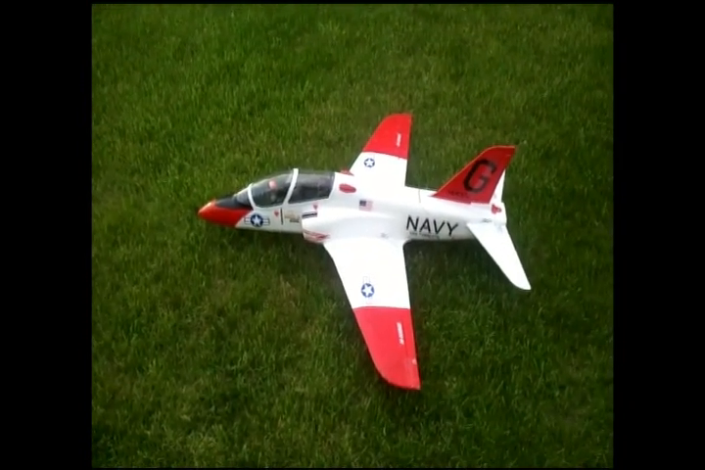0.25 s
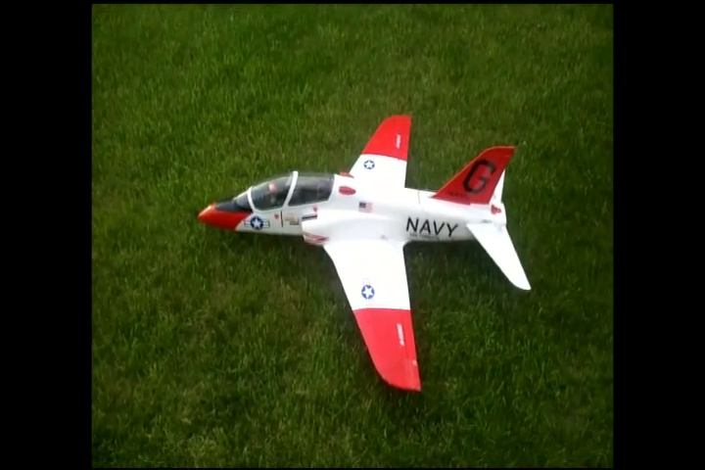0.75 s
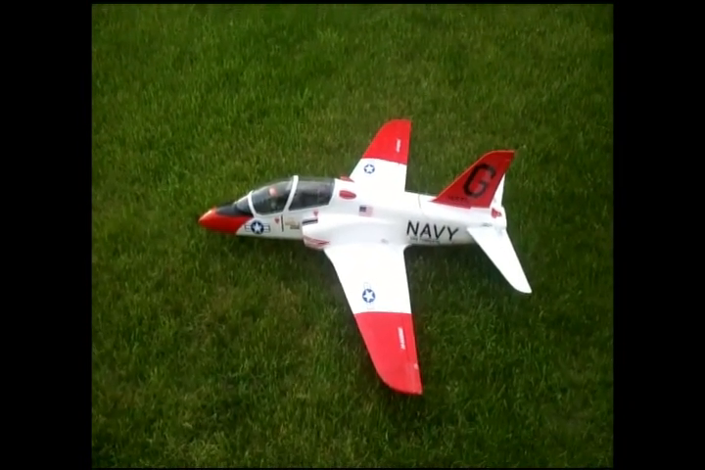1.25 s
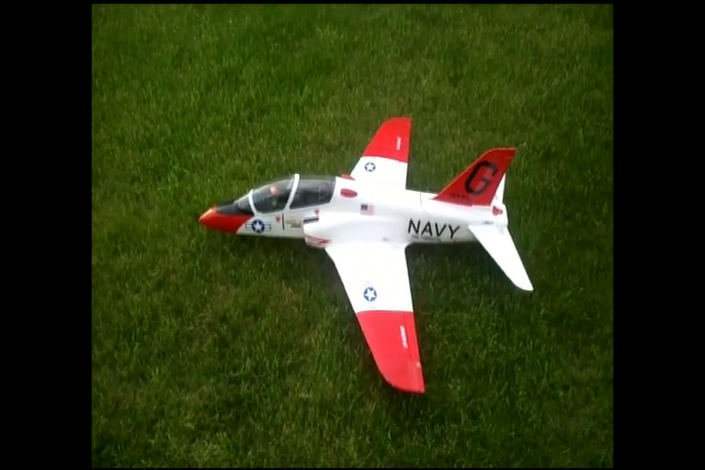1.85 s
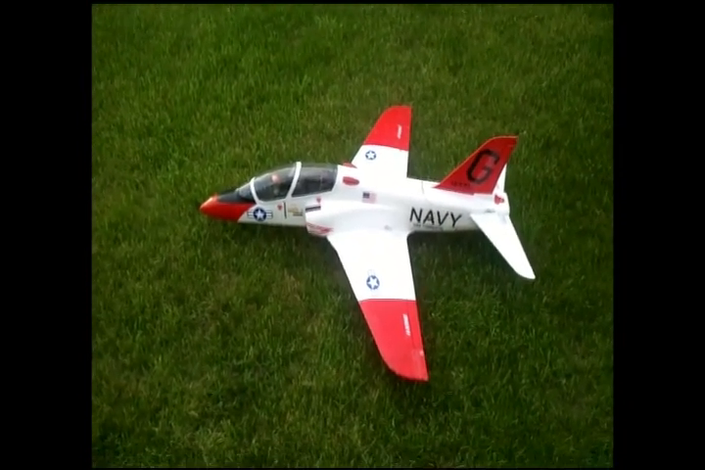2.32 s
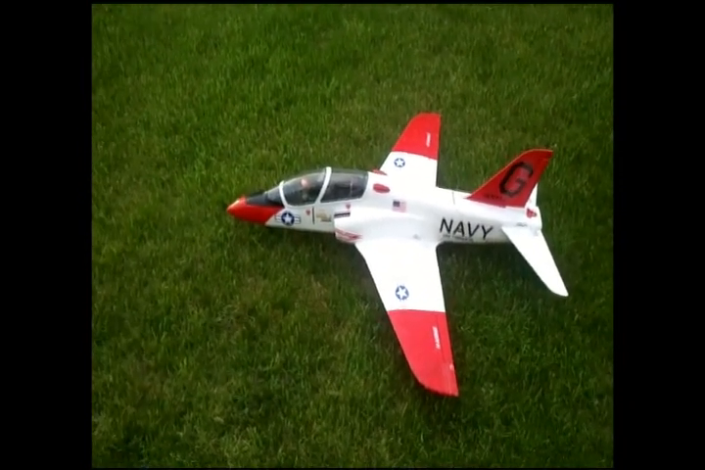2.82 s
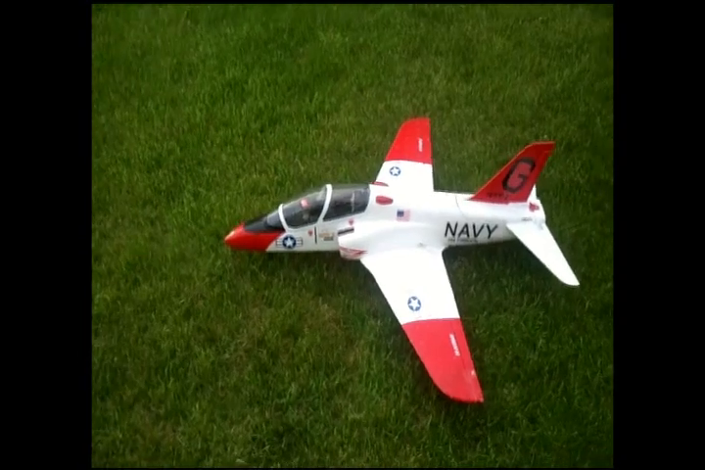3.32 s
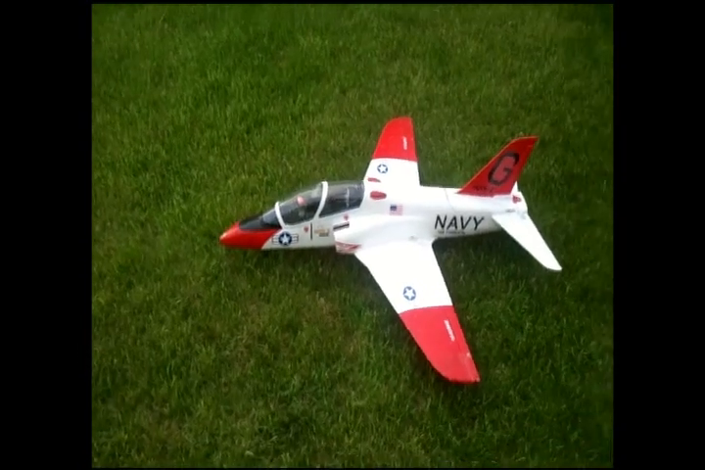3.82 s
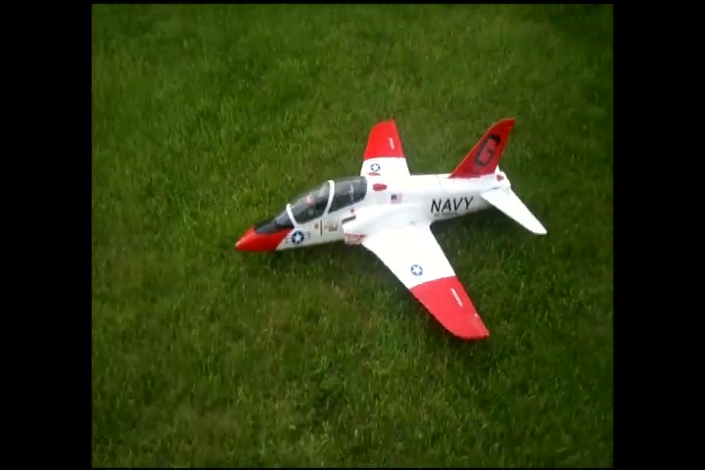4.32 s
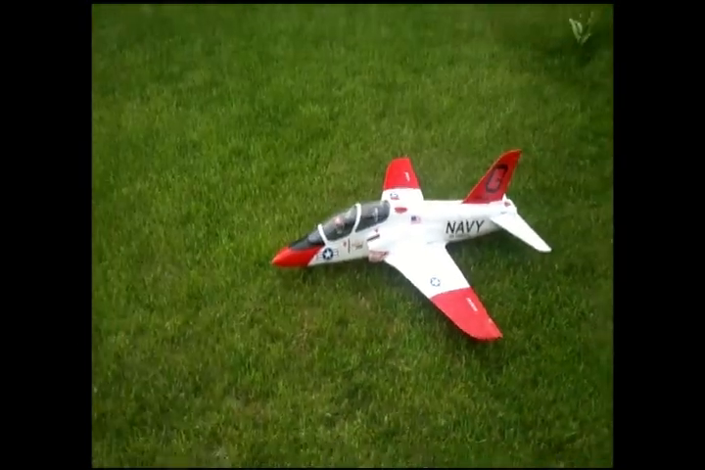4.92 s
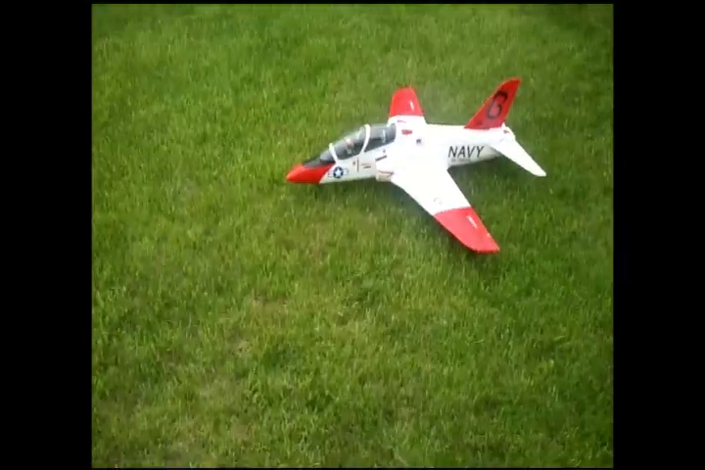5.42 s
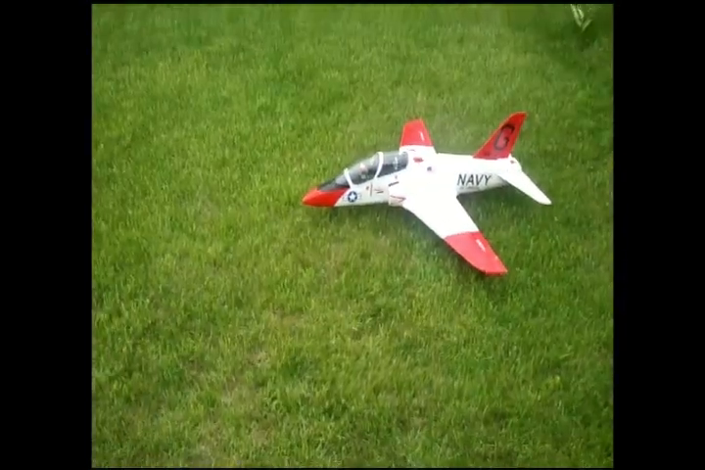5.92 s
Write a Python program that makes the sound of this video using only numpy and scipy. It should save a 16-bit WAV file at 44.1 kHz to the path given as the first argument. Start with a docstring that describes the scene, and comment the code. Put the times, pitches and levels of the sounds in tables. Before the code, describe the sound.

After faint chirps, a small electric ducted fan jerks into life and climbs to a high, airy whine while gusts bump the microphone.

```python
"""Birds call over a light wind and a distant hum; after a second, an electric ducted fan jerks into life.
The fan, in a foam model jet on a lawn, is throttled up in steps. Its rotor radiates harmonics of the
shaft speed (orders), lifted by airframe resonances, and rattles near one speed. The speed controller
whines at its switching rate, turbulent air rushes through the duct and the bearing hisses in puffs.
Gusts buffet the microphone, and a low drone passes near the end."""
import sys
import numpy as np
from scipy import signal
from scipy.fft import rfft, irfft
from scipy.io import wavfile
from scipy.ndimage import uniform_filter1d

SR = 44100
rng = np.random.default_rng(int(sys.argv[2]) if len(sys.argv) > 2 else 0)


def to_wav(sig):
    """Store sig (one row per channel, or 1-D mono) as 16-bit WAV at the path in sys.argv[1].

    Samples outside -1..1 are clipped; the rate is SR.
    """
    pcm = np.clip(np.atleast_2d(sig), -1, 1) * 32767
    pcm = np.round(pcm).astype(np.int16)
    wavfile.write(sys.argv[1], SR, pcm.T)  # frames by channels


N = 271656

# Shaft speed the throttle asks for: time_s, speed_rps (turns per second)
THROTTLE = [(1.085, 58.5), (1.26, 184.7), (1.293, 264.0), (1.305, 154.3), (1.45, 141.6), (2.011, 136.5),
            (2.032, 190.6), (2.177, 238.0), (2.578, 251.5), (2.976, 253.8), (3.304, 256.3), (3.492, 268.8),
            (3.698, 300.0), (3.796, 301.6), (3.915, 319.3), (4.429, 324.0), (4.505, 339.8), (4.754, 340.9),
            (4.976, 354.8), (5.166, 358.5), (5.306, 378.8), (5.432, 383.3), (5.87, 391.2), (5.937, 404.4),
            (6.16, 404.6)]
# Orders from 1 up (1 imbalance, 3 pole pairs, 5 blades, 18 commutation):
# base_level_at_cruise_db, gain_per_speed_doubling_db
ORDER_LEVELS = [(-42, 16.0), (-54.5, 9.5), (-53, 12.5), (-57.0, 13), (-49.5, 17), (-51.5, 9.5), (-65.5, 4),
                (-60, -2), (-61.5, 10.5), (-53, 10), (-53.5, 3), (-62, -2), (-64, 8.5), (-70, -9), (-61, 8),
                (-66.5, 3), (-76, 1), (-51.5, 12), (-64.5, -4), (-58.5, 15), (-67.5, 4.4), (-73, 0),
                (-77, 2)]
# Airframe resonances: centre_hz, width_hz, lift_db
AIRFRAME_MODES = [(185, 20.5, 17), (234.4, 7.2, 13.5), (342, 29, 7), (725, 23, 9), (946, 93, 10.5),
                  (1064, 30, 10.9), (1270, 80, 8.5), (1408, 147, 8), (1842, 25, 3), (2047, 40, 7.5),
                  (2165, 116, 4.5), (3322, 140, 2.5), (6330, 185, 10), (6910, 250, 12)]
# Brief swells and fades, listed by order: centre_s, length_s, gain_db
ORDER_SWELLS = dict( order_1=[(1.38, 0.18, 3.5), (2.22, .07, -3), (3.64, 0.36, -8.5), (4.36, .52, -5.4)],
                order_2=[(2.3, 0.19, 10), (3.75, 0.18, -11), (4.76, 0.38, 10), (5.51, 0.4, -15.5)],
                order_3=[(6.11, .72, -13)], order_4=[(2.5, 0.64, 10.5), (3.05, 0.37, -9),
                (5.85, 0.58, -19)], order_5=[(1.89, 0.21, -9), (2.45, 0.21, -4), (3.18, .35, -11),
                (3.85, 0.43, -8)], order_6=[(1.28, 0.083, 3), (1.42, 0.17, -8), (2.6, 0.17, -9),
                (3.1, 0.74, 3.5), (3.84, 0.5, -15), (5.69, 1.1, -13.5)], order_7=[(2.21, 0.79, 14),
                (3.43, 0.41, 16.5)], order_8=[(1.7, 0.55, 2.5), (3.0, 0.32, 8), (3.65, 0.15, 7.5)],
                order_9=[(3.2, 1.5, 12.5), (3.77, 0.32, -21)], order_10=[(1.3, 0.076, 10),
                (3.78, 0.23, 3.5), (4.21, 0.35, -12), (5.4, 0.13, -14), (6.04, 0.19, -11)],
                order_11=[(2.47, 0.67, 3), (2.18, 0.19, -2), (4, 0.69, -21), (5.35, .47, -20)],
                order_12=[(1.6, 0.69, -3)], order_13=[(3.1, 0.95, 5)], order_15=[(2.87, .51, 4.5),
                (4.3, 0.66, 15), (6.15, 0.15, 5)], order_18=[(1.22, 0.17, 20), (1.65, 0.41, 11),
                (2.28, 0.07, 7.5), (2.9, 1.14, -1.5), (3.68, 0.23, -8), (5.15, 0.32, -22),
                (5.92, 0.52, -25)], order_19=[(3.55, .45, -10), (4.14, 0.62, 17.5), (5.45, .3, 9)],
                order_20=[(2.9, 1.7, -1.5), (3.6, 0.43, -13), (4.1, 0.27, 1), (5.06, 0.86, -22)],
                order_21=[(4.75, 0.49, -12)])
# Beating of the bearing against the shaft: speed_rps, depth_ratio
BEAT_DEPTH = [(140, .9), (200, .4), (240, .35), (252, .65), (257, .6), (275, .3), (404, .2)]
# Orders that swell together on the beat: order
IN_STEP_ORDERS = (6, 9, 12, 13, 14, 15, 16, 17, 19)
# Partials of the rattle: order, gain_db
RATTLE_PARTIALS = [(1.5, -16), (2.5, -20), (3.5, -.1), (4.5, -8), (5.5, -6), (6.5, -19), (7.5, -17)]
# Base levels looked up along the shaft speed: speed_rps, low_air_db, high_air_db, sideband_db, octave_db, #
# bearing_db (the whine below the octave fades out late in the run)
LEVELS_BY_SPEED = [(20, -51, -60.5, -51, -71, -80), (145, -50.5, -59, -70, -69, -61.5),
                   (210, -50, -52, -54, -56, -76), (252, -43.5, -46.5, -46, -54.5, -85),
                   (300, -43.5, -44, -42, -59, -73), (318, -41.5, -42.5, -43, -83, -90),
                   (410, -39.5, -40.5, -44.5, -93, -90)]
# Switching rate, which sags as the parts warm: time_s, pitch_hz
SWITCH_PITCH = [(1.084, 7995), (3.0, 7995), (3.6, 7989), (4.5, 7986), (6.16, 7989)]
# Strength of the switching tone: time_s, level_db
SWITCH_LEVEL = [(1.08, -44), (1.11, -45), (1.28, -39), (1.38, -49.5), (1.97, -48.5), (2.07, -40.5),
                (2.88, -38.5), (3.36, -52), (3.68, -37), (3.97, -36.5), (4.28, -60), (4.43, -45),
                (5.0, -40.5), (5.35, -44), (6.16, -53)]
# Sideband offsets in shaft orders, around the switching tone and below its octave
SIDE_ORDERS, OCTAVE_ORDERS = (-5, -3, -2, -1, 1, 2, 3, 5), (6, 7, 8, 9, 10, 11, 12, 16)
# Weights of those two sets of sidebands: gain_db
SIDE_GAINS = [-18, -17, -17, -3, -.5, -7, -13, -15]
OCTAVE_GAINS = [-3, -5, -9, -8, -11, -10, -8, -15]
# Jerks of the rotor from the first current pulses: start_s, level_db
START_KICKS = [(1.086, -48), (1.108, -47)]
# Noise spectra of duct air, bearing, wind and neighbourhood: frequency_hz, relative_density_db
DUCT_LOW_SPECTRUM = [(120, -11), (300, -2.5), (600, -8), (1000, -1), (1600, -0.5), (2100, -0.5), (2800, -6),
                     (3800, -5), (4800, -18)]
DUCT_HIGH_SPECTRUM = [(4300, -1.5), (5100, -7), (6500, 0.5), (8000, -1.5), (9500, -3.5), (12000, -8.5),
                      (12900, -27), (15000, -58)]
BEARING_SPECTRUM = [(1600, -2), (1850, -15), (2250, 2), (2500, -34)]
WIND_SPECTRUM = [(8.8, -24), (15, 1), (38, -0.5), (72, -12.5), (130, -23), (170, -31), (290, -120)]
FAR_SPECTRUM = [(60, -14), (150, -2.5), (300, -2), (550, -8.5), (1100, -8.5), (2200, -11.5), (2500, -18),
                (5000, -21.5), (14500, -24.5)]
# Breeze on the microphone: time_s, level_db
BREEZE = [(0, -53), (2.3, -49.5), (3.0, -49.5), (3.7, -43), (4.3, -49), (5.1, -53), (5.7, -46.5),
          (6.16, -46)]
# Gusts on top of the breeze: centre_s, length_s, level_db
GUSTS = [(1.057, 0.032, -49), (1.206, .06, -42), (1.275, 0.06, -44), (1.68, 0.089, -54), (2.207, .06, -43),
         (2.48, 0.05, -52), (3.45, .12, -49), (3.6, 0.068, -45), (3.73, 0.16, -49), (3.877, 0.066, -40),
         (4.017, 0.11, -37), (4.624, 0.31, -45.5), (5.954, 0.04, -48), (6.03, .04, -34)]
# Gusts that hit the microphone squarely: start_s, push_db
THUMPS = [(3.597, -33), (3.866, -23), (6.03, -42)]
# Bird notes: start_s, length_s, first_pitch_hz, last_pitch_hz, glide_fraction, level_db
BIRD_NOTES = [(.345, .03, 3800, 3500, .5, -68), (.365, .075, 3150, 2450, .6, -63),
              (.585, .2, 3050, 2780, .06, -58), (.755, .028, 3650, 3680, .5, -68),
              (.77, .1, 2470, 2400, .15, -66), (.818, .12, 2690, 3800, .08, -55),
              (.905, .045, 4000, 5700, .45, -72), (1.648, .052, 4800, 3550, .95, -61),
              (5.35, .1, 1300, 1240, .4, -43)]
# Reflections from hedges and walls: delay_s, gain_db
GARDEN_ECHOES = [(.011, -9), (.027, -12), (.048, -15)]
# Faint tones of the neighbourhood: pitch_hz, level_db
FAR_TONES = [(1100, -75), (2229, -73)]
# Passing drone: time_s, pitch_hz, level_db
DRONE = [(5.1, 68.6, -66), (5.35, 72, -49), (5.6, 79.7, -45), (5.8, 80, -56), (5.95, 82, -77)]

ROTOR_LAG_S, CRUISE_RPS, FULL_PULL_RPS_PER_S = .11, 250, 400
SMOOTH_RPS, STUTTER_TURNS, SPIN_UP_DB = 120, .07, 3   # below this speed the rotor jitters and is weaker
TURNS_PER_BEAT, BEAT_CREST_S = 15.29, 2.83
RATTLE_RPS, RATTLE_SPAN_RPS, RATTLE_DB = 278.2, 11, -36.5
PULL_ORDER, PULL_DB = -9, -59   # a far sideband, heard while the motor pulls hard
STRAIN_DB, CATCH_S = 7, 1.12   # extra air noise at full pull; moment the rotor catches
NOTCH_HZ, NOTCH_WIDTH_HZ, NOTCH_DB = 4550, 400, -14
BIRD_START_DB, BIRD_END_DB = -8, -14   # relative to the moment the glide settles
CUTOFF_HZ = 14720


def rotor(turns, speed, beats, depth):
    """Periodic forcing radiates shaft harmonics; resonance lifts each as it passes an airframe mode."""
    step = 64   # samples between values of the slow level curves
    coarse_speed, out = np.maximum(speed[::step], 1), 0
    for order, (db, doubling_db) in enumerate(ORDER_LEVELS, start=1):
        resonance = 1 + sum(from_db(2 * lift_db) / (1 + (2 * (order * coarse_speed - hz) / width) ** 2)
                            for hz, width, lift_db in AIRFRAME_MODES)
        level = db + doubling_db * np.log2(coarse_speed / CRUISE_RPS) + 10 * np.log10(resonance)
        level += SPIN_UP_DB * np.minimum(np.log2(coarse_speed / SMOOTH_RPS), 0)
        level += (order > 6) * 1.8 * drift(3)[::step]
        swells = ORDER_SWELLS.get("order_" + str(order), [])
        level += sum(swell_db * bump(s, length, step) for s, length, swell_db in swells)
        level = np.interp(np.arange(N) / step, np.arange(len(level)), level)
        if order == 1:   # the imbalance tone does not throb
            out += tone(turns, level + .63 * drift(13))
        else:
            out += throb(order, beats, depth) * tone(order * turns, level + 2 * drift(15))
    return out


def shaft():
    """Speed follows the throttle as a first-order lag; pull is its acceleration, scaled to 0-1."""
    pole = np.exp(-1 / (ROTOR_LAG_S * SR))
    speed = signal.lfilter([1 - pole], [1, -pole], in_time(THROTTLE)[0] * during(THROTTLE))
    pull = np.clip(np.gradient(speed) * SR / FULL_PULL_RPS_PER_S, 0, 1)
    return speed, uniform_filter1d(pull, size=2000)


def throb(order, beats, depth):
    """Beating between bearing and shaft modulates the amplitude of one order."""
    if order in IN_STEP_ORDERS:
        return 1 + depth * np.cos(2 * np.pi * beats)
    return 1 + .5 * depth * np.cos(2 * np.pi * (beats + rng.random()))


def rattle(turns, speed):
    """Period doubling: near one speed the fan rattles every second turn, giving half orders."""
    level = RATTLE_DB - 6 * ((speed - RATTLE_RPS) / RATTLE_SPAN_RPS) ** 2
    return sum(tone(order * turns, level + db + 2 * drift(20)) for order, db in RATTLE_PARTIALS)


def controller(turns, pull, sideband_db, octave_db):
    """Modulation: sidebands lie whole shaft orders away from the switching tone and its octave."""
    cycles = np.cumsum(in_time(SWITCH_PITCH)[0]) / SR
    out = tone(cycles, in_time(SWITCH_LEVEL)[0] + .73 * drift(38))
    for order, db in zip(SIDE_ORDERS, SIDE_GAINS):
        out += tone(cycles + order * turns, sideband_db + db + 1.2 * drift(4))
    for order, db in zip(OCTAVE_ORDERS, OCTAVE_GAINS):
        out += tone(2 * cycles - order * turns, octave_db + db + 4 * drift(8))
    return out + pull * tone(cycles + PULL_ORDER * turns, PULL_DB + 3 * drift(26))


def duct_air(turns, pull, low_db, high_db):
    """Turbulence makes broadband noise that bursts at the first jerks and pulses lightly once a turn."""
    caught = np.clip((np.arange(N) / SR - CATCH_S) / .005, .1, 1)
    flow = caught * from_db(STRAIN_DB * pull ** 2)
    kicks = decays(START_KICKS, decay_s=.005)
    low = (flow * from_db(low_db + 1.1 * drift(10.6)) + kicks) * coloured(DUCT_LOW_SPECTRUM)
    high = (flow * from_db(high_db + .8 * drift(26)) + kicks) * coloured(DUCT_HIGH_SPECTRUM)
    return (low + high) * (1 + .022 * np.sin(2 * np.pi * turns))


def bearing(level_db, beats, depth):
    """Amplitude modulation breaks the bearing's band of hiss into puffs, one on every beat."""
    puffs = (1 + depth * np.cos(2 * np.pi * beats)) ** 2
    return from_db(level_db) * puffs * coloured(BEARING_SPECTRUM)


def lawn_notch(sound):
    """Destructive interference with the echo off the lawn, taken as one smooth dip in the spectrum."""
    hz = np.arange(N // 2 + 1) * SR / N
    dip_db = NOTCH_DB * np.exp(-((hz - NOTCH_HZ) / NOTCH_WIDTH_HZ) ** 2)
    return irfft(rfft(sound) * from_db(dip_db), N)


def wind():
    """Pressure fluctuations on the microphone make a low rumble that swells with each gust."""
    breeze = from_db(in_time(BREEZE)[0] + 2 * drift(7.5))
    gusts = sum(from_db(db) * bump(s, length) for s, length, db in GUSTS)
    return (breeze + gusts) * coloured(WIND_SPECTRUM)


def thumps():
    """Damped transient response: a direct gust pushes the capsule, which swings back once."""
    capsule = signal.butter(2, [35, 130], "band", fs=SR, output="sos")
    return 2.04 * signal.sosfilt(capsule, decays(THUMPS, decay_s=.0048))


def birds():
    """Whistled notes glide and settle; reflection returns delayed, weaker copies."""
    notes = []
    progress = np.linspace(0, 1, num=21)
    for s, length, first_hz, last_hz, glide, db in BIRD_NOTES:
        hz = np.interp(progress, [0, glide], [first_hz, last_hz])
        level = db + np.interp(progress, [0, glide, 1], [BIRD_START_DB, 0, BIRD_END_DB])
        notes.append(np.transpose([s + length * progress, hz, level]))
    direct = glides(notes, waver_db=3)
    return direct + sum(from_db(db) * np.roll(direct, round(s * SR)) for s, db in GARDEN_ECHOES)


def drone():
    """A low, nearly pure tone swells and fades as its frequency rises."""
    return glides([DRONE], waver_db=-1.5)


def neighbourhood():
    """Distant sound is a superposition of broadband noise and faint tones, each wavering in level."""
    murmur = from_db(-59 + .6 * drift(4)) * coloured(FAR_SPECTRUM)
    hum = sum(tone(hz * np.arange(N) / SR, db + 4.5 * drift(4)) for hz, db in FAR_TONES)
    return murmur + hum


def glides(notes, waver_db):
    """Phase integrates a trembling frequency; each note has rows of time_s, pitch_hz, level_db."""
    out = np.zeros(N)
    for note in notes:
        hz, level = in_time(note)
        hz = hz * (1 + .008 * drift(60))
        out += during(note) * tone(np.cumsum(hz) / SR, level + waver_db * drift(27))
    return out


def tone(cycles, level_db):
    """Simple harmonic motion at an rms level, along a running cycle count with random initial phase."""
    return np.sqrt(2) * from_db(level_db) * np.sin(2 * np.pi * (cycles + rng.random()))


def coloured(spectrum):
    """Spectral shaping gives white noise a colour, at rms 1."""
    hz, level = np.transpose(spectrum)
    bin_hz = np.maximum(np.arange(N // 2 + 1) * SR / N, 1)
    gain = from_db(np.interp(np.log(bin_hz), np.log(hz), level, left=-90, right=-90))
    return rms_one(irfft(rfft(rng.standard_normal(N)) * gain, N))


def drift(corner_hz):
    """Two-pole low-pass filtering turns noise into a slow random fluctuation of rms about 1."""
    pole = np.exp(-128 * np.pi * corner_hz / SR)
    noise = rng.standard_normal(N // 64 + 1002)   # one value per 64 samples, plus time to settle
    slow = signal.lfilter([1], [1, -2 * pole, pole * pole], noise)[1000:]
    return np.interp(np.arange(N) / 64, np.arange(len(slow)), rms_one(slow))


def decays(events, decay_s):
    """Envelope that jumps at each event and decays exponentially."""
    impulses = np.zeros(N)
    for s, db in events:
        impulses[round(s * SR)] = from_db(db)
    return signal.lfilter([1], [1, -np.exp(-1 / (decay_s * SR))], impulses + 1e-18)


def bump(centre_s, length_s, step=1):
    """Gaussian envelope of height 1, at every step-th sample."""
    offset_s = np.arange(0, N, step) / SR - centre_s
    return np.exp(-np.minimum((2 * offset_s / length_s) ** 2, 40))


def look_up(rows, positions):
    """Linear interpolation of a table's other columns along its first."""
    axis, *columns = np.transpose(rows)
    return [np.interp(positions, axis, column) for column in columns]


def in_time(rows):
    """Columns of a time table, interpolated at every sample."""
    return look_up(rows, np.arange(N) / SR)


def during(rows):
    """Rectangular window over the time span of a table."""
    t = np.arange(N) / SR
    return (t >= rows[0][0]) & (t <= rows[-1][0])


def from_db(db):
    """Decibels to amplitude ratio, with a floor at -200 dB."""
    return np.exp(np.log(10) / 20 * np.maximum(db, -200))


def rms_one(x):
    """Normalisation to rms 1."""
    return x / np.sqrt(np.mean(x ** 2) + 1e-20)


def scene():
    """Superposition: the pressures from the jet and its surroundings add at one microphone."""
    speed, pull = shaft()
    low_db, high_db, sideband_db, octave_db, bearing_db = look_up(LEVELS_BY_SPEED, speed)
    turns = np.cumsum(speed) / SR
    beats = (turns - turns[round(BEAT_CREST_S * SR)]) / TURNS_PER_BEAT
    depth = look_up(BEAT_DEPTH, speed)[0]
    turns += STUTTER_TURNS * np.clip(1 - speed / SMOOTH_RPS, 0, 1) * drift(77)   # jerky start
    jet = rotor(turns, speed, beats, depth) + rattle(turns, speed) + bearing(bearing_db, beats, depth)
    jet += controller(turns, pull, sideband_db, octave_db) + duct_air(turns, pull, low_db, high_db)
    outdoors = wind() + thumps() + neighbourhood() + birds() + drone()
    return (lawn_notch(jet * during(THROTTLE)) + outdoors)[None]


def record(dry):
    """Band limiting: a steep low-pass filter removes the highest treble."""
    return signal.sosfilt(signal.cheby2(24, 70, CUTOFF_HZ, fs=SR, output="sos"), dry)


dry = scene()
out = record(dry)
to_wav(out)
```